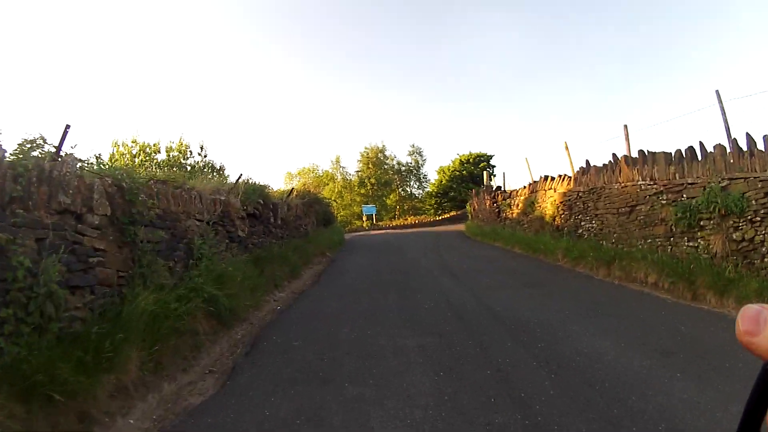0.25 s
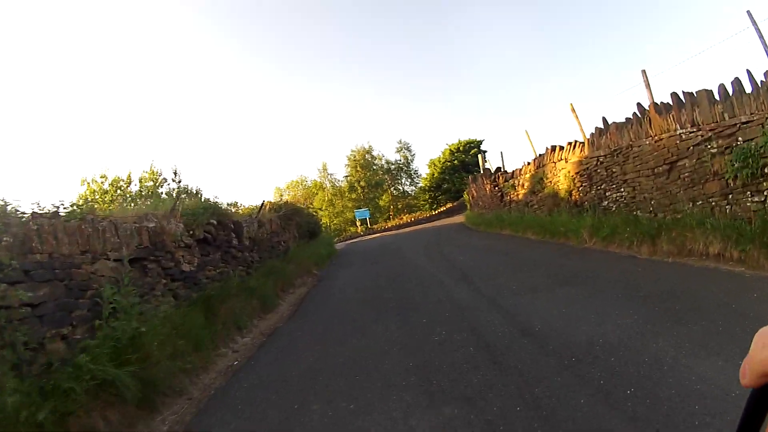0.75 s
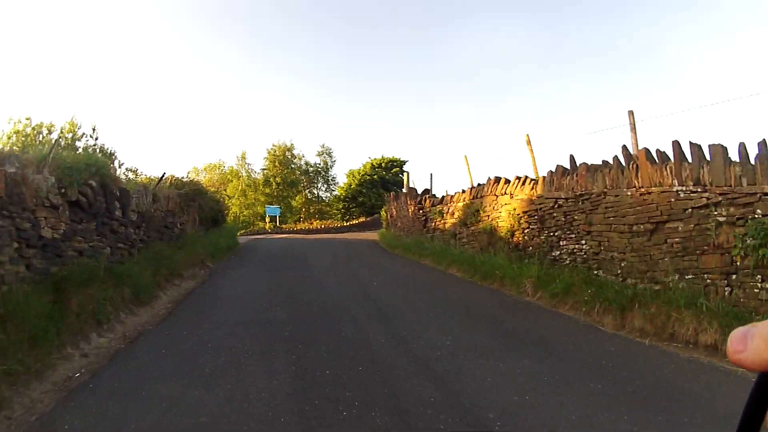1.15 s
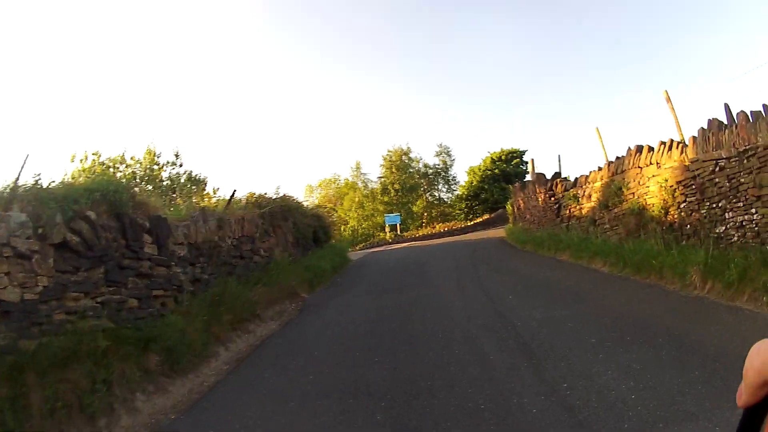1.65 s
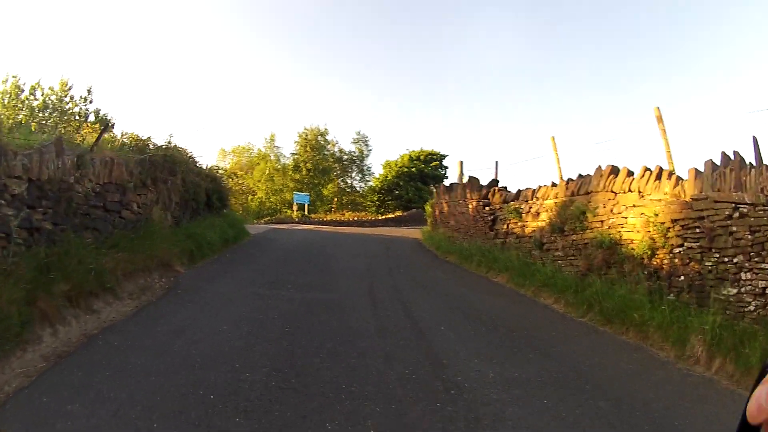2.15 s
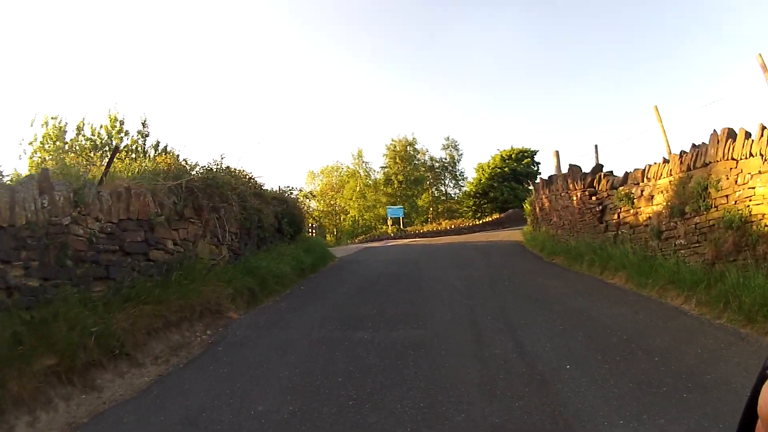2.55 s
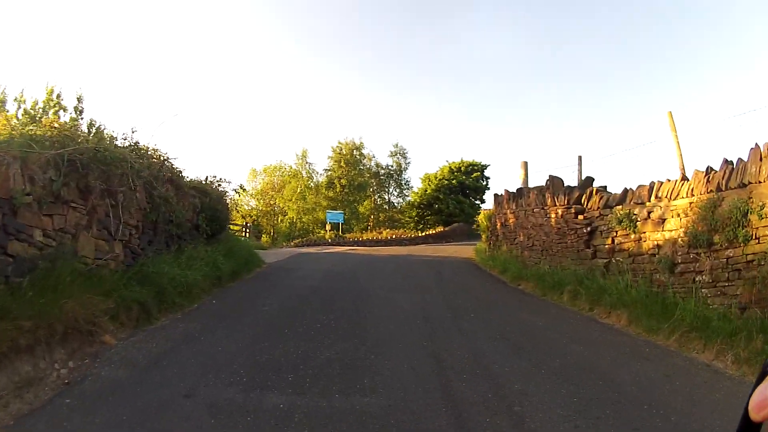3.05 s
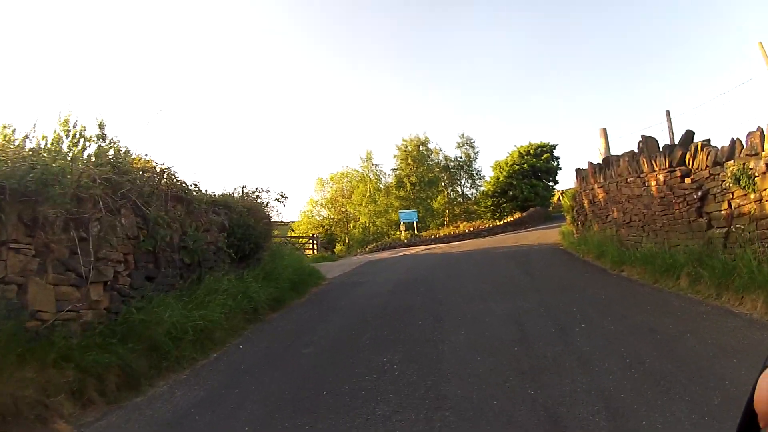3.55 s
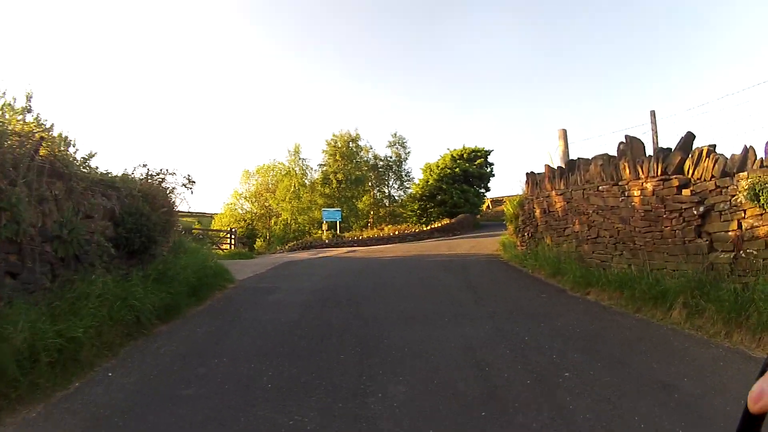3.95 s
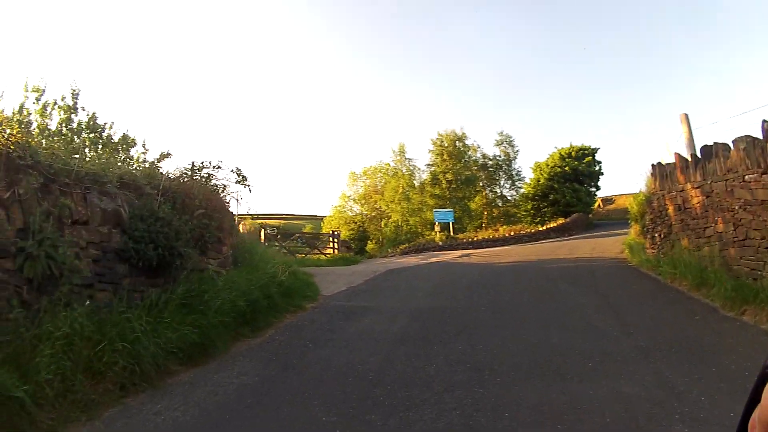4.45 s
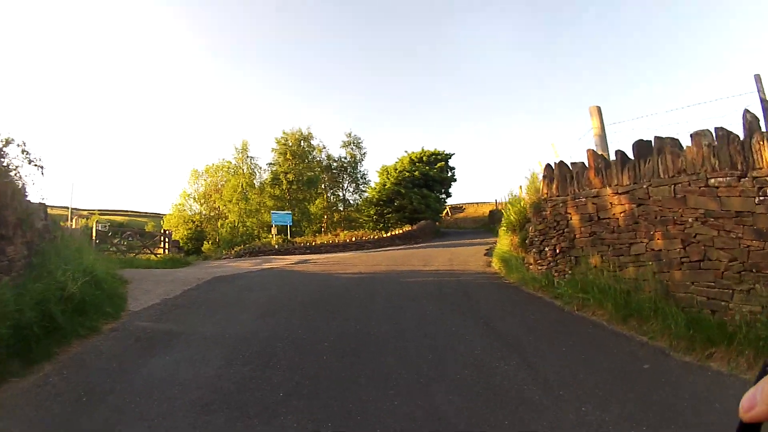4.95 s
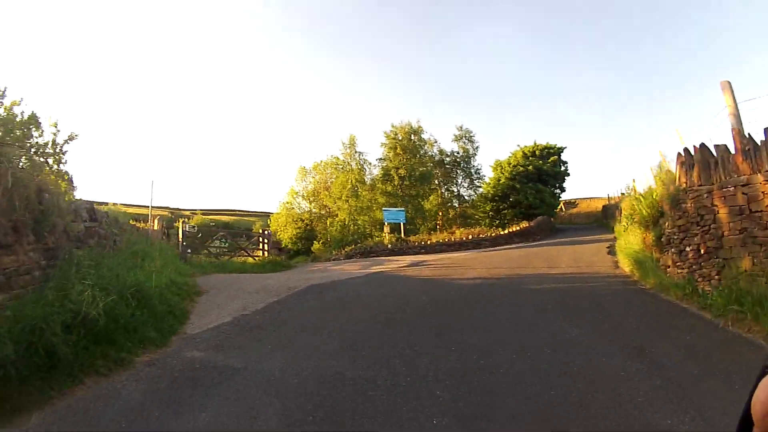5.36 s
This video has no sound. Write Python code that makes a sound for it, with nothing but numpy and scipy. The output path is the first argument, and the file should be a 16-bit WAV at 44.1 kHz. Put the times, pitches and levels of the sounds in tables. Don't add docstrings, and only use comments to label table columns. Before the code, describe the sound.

Continuous muffled road vibration from a climbing bike, dominated by low hum and rumble, rising and falling with each pedal stroke. Short dry plastic knocks and lighter ticks scatter throughout, denser in the first half, with brief cable scrapes near the start and a crisp snap at about 1.2 seconds. Outdoors with no audible echo; the single microphone sits inside a case on the bar, catching low wind thumps and faint electronic hiss.

```python
import sys
import numpy as np
from scipy import signal
from scipy.fft import rfft, irfft
from scipy.io import wavfile
from scipy.ndimage import uniform_filter1d, map_coordinates

SR = 44100
rng = np.random.default_rng(int(sys.argv[2]) if len(sys.argv) > 2 else 0)


def elevation(decibels):
    levels = np.asarray(decibels, float)
    return 10 ** (levels / 20)


def wrap_up_sound(samples):
    columns = np.atleast_2d(samples).T
    tamed = np.clip(columns, -1, 1)
    steps = np.round(tamed * 32767).astype(np.int16)
    wavfile.write(sys.argv[1], SR, steps)


N = 246519
TIME = np.arange(N) / SR

# [f/Hz, width/Hz, level/dB]
WALLS = [(672, 156, -10.5), (815, 142, -0.5), (986, 53.6, 3.5), (1108, 85, -3.5), (1442, 210, -11.5),
         (1715, 135, -11), (2001, 115, -11.5)]
# [f/Hz, width/Hz, level/dB]
CAVITY = [(2520, 193, 0.5), (2906, 126, 9), (3217, 318, -1.5), (3550, 280, -7.5)]
# [f/Hz, width/Hz, level/dB]
CLAMP_AND_DOOR = [(4236, 190, 4.5), (5080, 570, -4), (5510, 400, 0.5), (6220, 610, -6)]
# [t/s of full load, push/dB, slack after it/dB, bar twist/dB, fork dive/dB]
STROKES = [(-.1, 3, -4, -6, -2), (.37, 4.5, -5, 2, 0.5), (.84, 3.5, -3.5, 2.5, 0.5), (1.31, 4, -3, 4, -0.5),
           (1.76, 3.5, -4, 3, -0.5), (2.21, 4, -3, 1, -2), (2.71, 4, -4, 1, -0.5),
           (3.17, 4.5, -5.5, -2, 2.5), (3.65, 2.5, -4, 2, -2), (4.14, 3, -3, 4, 1.5),
           (4.64, 4.5, -3.5, -3, -1), (5.11, 3.5, -3.5, -4, 0), (5.59, 3.5, -4, -1, 0), (6.06, 3, -4, 0, 0)]


def unit(x):
    return x / np.sqrt(np.mean(x ** 2) + 1e-20)


def wobble(rate):
    knots = rng.standard_normal(int(N * rate / SR) + 4)
    return map_coordinates(knots, [TIME * rate])


def filtered(x, response):
    return irfft(rfft(x) * response(np.fft.rfftfreq(len(x), 1 / SR)), len(x))


def rung(x, modes, low_hz, high_hz):
    def response(f):
        peaks = 0
        for k, (centre, width, db) in enumerate(modes):
            peak = 1j * f * width / (centre * centre - f * f + 1j * f * width)
            peaks = peaks + (-1) ** k * elevation(db) * peak
        low_cut = (1j * f / (low_hz + 1j * f)) ** 2
        high_cut = (high_hz / (high_hz + 1j * f)) ** 3
        return peaks * low_cut * high_cut
    return filtered(x, response)


def struck(x, modes, low_hz, high_hz):
    blow = rung(np.eye(1, 2048)[0], modes, low_hz, high_hz)
    return rung(x, modes, low_hz, high_hz) / np.abs(blow).max()


def texture(*wobbles):
    return rng.standard_normal(N) * elevation(sum(db * wobble(rate) for rate, db in wobbles))


def evened(x, span, share):
    power = np.abs(uniform_filter1d(unit(x) ** 2, max(int(span * SR), 2))) + .02
    return unit(x / power ** (share / 2))


def contacts(events, low_hz, high_hz):
    t = np.arange(2048) / SR
    hz = np.fft.rfftfreq(len(t), 1 / SR)
    band = (hz > low_hz) & (hz < high_hz)
    drive = np.zeros(N + len(t))
    for s, db, contact in events:
        u = t / contact
        burst = rng.standard_normal(len(t)) * u * np.exp(-u)
        burst /= np.sqrt(np.mean(np.abs(rfft(burst)[band]) ** 2))
        longer = np.sqrt(1 + contact / 0.0013)
        drive[round(s * SR):][:len(t)] += elevation(db) * burst * longer
    return drive[:N]


def swells(rows):
    knots = TIME[::64]
    return np.interp(TIME, knots, sum(db * np.exp(-((knots - s) / half) ** 2) for s, db, half in rows))


def answer(part, extra_db=0):
    # [level/dB, dB per dB of load, lag/s, own unrest/dB, dB per dB of jolt]
    answers = dict(sway=(-36.3, 0.73, -.005, 1.1, .8), hum=(-43.5, 1.35, -.03, 1.5, 0.87),
               rumble=(-38.2, .95, .005, 0.6, .95), drone=(-51.3, .45, 0.1, 1.4, 1),
               walls=(-58.7, 1.05, -.015, 0.9, 1), tyre=(-67.2, .7, -.02, .6, 1.3),
               cavity=(-61.5, 0.5, -0.1, 0.8, 0.6), whistle=(-85, 0.14, 0.8, .6, 0.1))
    # [t/s, jolt/dB, half length/s]
    bumps = [(.06, 3, .02), (.31, 3, 0.011), (.43, 3, 0.016), (.705, 7, 0.019), (.86, 4.5, 0.032),
             (1.02, 2.5, 0.033), (1.26, 3.5, 0.024), (1.34, 3, 0.024), (1.48, 3, 0.026), (1.8, 2, 0.027),
             (1.95, 3, .03), (2.16, 2.5, 0.019), (2.52, 1.5, .03), (2.71, 2, .03), (3.13, 2, 0.022),
             (3.47, 5.5, .015), (3.58, 3, 0.018), (3.69, 2, 0.026), (3.81, 1.5, 0.022), (4.01, 3.5, .015),
             (4.13, 2.5, 0.03), (4.47, 3, 0.022), (4.69, 2, .02), (5.07, 2, 0.023), (5.46, 1.5, .03)]
    slack_at = 0.58
    level_db, grows, lag, unrest_db, shaken = answers[part]
    s, push, slack = np.transpose(STROKES)[:3]
    turns = np.ravel([s[:-1], s[:-1] + slack_at * np.diff(s)], "F")
    at_push = grows * push[:-1] + (extra_db + 0 * s)[:-1]
    load = np.ravel([at_push, grows * slack[:-1]], "F")
    place = np.interp(TIME - lag, turns, np.arange(len(turns)))
    eased = np.floor(place) + np.sin(np.pi / 2 * (place % 1)) ** 2
    load_db = np.interp(eased, np.arange(len(load)), load)
    return elevation(level_db + load_db + shaken * swells(bumps) + unrest_db * wobble(14))


def preamp_hiss():
    # [f/Hz, level/dB per Hz]
    colour = [(2940, -26.5), (5000, -4.5), (5530, -11.5), (7000, -6.5), (12300, -8), (15000, -9)]
    f, level = np.transpose(colour)
    noise = filtered(rng.standard_normal(N), lambda hz: elevation(np.interp(np.log(hz + 1), np.log(f), level)))
    return elevation(-77.5) * unit(noise)


def wind():
    # [t/s, buffet level/dB]
    air = [(0.0, -58), (0.03, -45), (0.28, -53), (0.39, -40), (0.48, -53), (0.9, -44.5), (2.63, -46.5),
           (2.72, -57), (2.79, -45.5), (3.49, -44.5), (3.53, -55), (3.77, -46.5), (3.95, -52), (4.03, -38),
           (4.17, -48.5), (5.17, -43), (5.31, -53), (5.59, -43)]
    # [t/s, swell/dB, half length/s]
    gusts = [
        (0, 7, .06),
        (.82, 5, .08),
        (1.28, 5, 0.1),
        (3.11, 6, .08),
        (4.05, 2.5, .04),
        (4.33, 6, .03),
        (5.28, 2.5, .05),
        (5.59, 7, 0.065),
    ]
    case_modes = [(54.4, 14, 3.5), (28, 14, -13.5)]  # f/Hz, width/Hz, level/dB
    buffet = evened(rung(texture(), case_modes, low_hz=13, high_hz=150), span=0.25, share=0.54)
    whistle = unit(rung(texture((25, 1.5), (80, 2.2)), CLAMP_AND_DOOR[1:], low_hz=3930, high_hz=8800))
    buffet_gain = elevation(np.interp(TIME, *np.transpose(air)) + 1.5)
    whistle_gain = answer("whistle") * elevation(swells(gusts) + 2.5)
    return buffet_gain * buffet + whistle_gain * whistle


def case():
    grains = (rng.random(N) < 420 / SR) * elevation(2.7 * rng.standard_normal(N))
    grit = unit(signal.fftconvolve(grains, np.hanning(80), "same"))
    buzz = unit(elevation(2.2 * wobble(40)) * texture((120, 1.5)) * (1 + 0.53 * grit))
    drone = rung(texture((20, 1.2)) + .3 * buzz, WALLS[:4], low_hz=405, high_hz=2520)
    drone = evened(drone, span=0.077, share=0.67)
    hiss = unit(rung(texture((60, 1.2)) + 0.47 * buzz, WALLS[4:], low_hz=1180, high_hz=3980))
    cavity = unit(rung(buzz, CAVITY, low_hz=2350, high_hz=5600))
    clamp = unit(rung(buzz * elevation(0.93 * wobble(10)), CLAMP_AND_DOOR[:1], low_hz=4000, high_hz=9000))
    walls = answer("walls") * drone + answer("tyre") * hiss
    return walls + answer("cavity") * (cavity + elevation(-18) * clamp)


def snap():
    # [t/s, level/dB]
    blow = (1.1712, -30.5)
    # [f/Hz, level/dB, t60/s]
    door = [(2320, 1.5, 0.006), (2850, -0.5, 0.0065), (3500, -4, 0.0036), (4260, -5, .004),
            (5270, 3, 0.0047), (6200, -12, 0.0053), (8200, -19, 0.0037), (9600, -19, .004),
            (12500, -26, .003)]
    t = TIME[:2048]
    ring = sum(elevation(db - 60 * t / t60) * np.sin(2 * np.pi * hz * t) for hz, db, t60 in door)
    onset = 1 - np.exp(-(t / 0.00039) ** 2)
    start = round(blow[0] * SR)
    return np.pad(elevation(blow[1]) * ring * onset, (start, N - start - len(t)))


def knocks():
    # [t/s, peak/dB, wall modes/dB, contact/ms]
    hard_knocks = [(0.0822, -38.1, -23, 1.5), (0.3032, -39.2, -17, 0.87), (0.443, -33.5, -21, 1.7),
                   (0.4977, -34.8, -16, 0.92), (0.7262, -31.1, -36, 1.1), (0.7544, -33.1, -23, 1.6),
                   (0.9773, -34.1, -25, 1.2), (1.048, -42.9, -14, 1.1), (1.36, -37.4, -21, 0.92),
                   (1.3799, -36.3, -18, 0.7), (1.3959, -30.1, -28, 0.63), (1.6214, -35.1, -11, 0.89),
                   (1.9037, -41.7, -13, 1.2), (1.9167, -36.2, -19, 1.2), (2.5373, -35.4, -21, 1.1),
                   (2.5942, -35.7, -13, 1.1), (2.6211, -34.9, -20, 1.5), (3.0491, -38.7, -18, 0.8),
                   (3.2382, -35.1, -20, 0.92), (3.4806, -35.3, -23, 1.2), (3.5545, -35.0, -26, 1.2),
                   (3.7894, -34.5, -28, 0.45), (3.9142, -39.8, -12, 1.7), (4.0055, -36.6, -11, 0.82),
                   (4.2025, -39.1, -15, 0.82), (4.3861, -38.1, -24, 0.78), (4.4884, -36.0, -25, 0.65),
                   (4.6974, -36.3, -24, 1.1), (5.2711, -36.7, -27, 1.1), (5.5001, -37.2, -19, 0.48)]
    # [t/s, peak/dB]
    taps = [(0.2173, -50.6), (0.4299, -47.9), (0.4642, -36.2), (0.706, -40.3), (1.098, -45.5),
            (1.2956, -39.2), (1.563, -38.2), (1.8798, -40.2), (2.0378, -41.4), (2.0707, -39.3),
            (2.1008, -39.3), (2.277, -38.7), (2.9204, -50.5), (2.9367, -40.8), (3.096, -43.2),
            (3.205, -42.7), (3.537, -46.5), (3.5939, -38.7), (3.8413, -37.5), (3.9002, -44.2),
            (4.0284, -46.7), (4.0784, -42.4), (4.1042, -38.6), (4.2215, -38.9), (4.3148, -39.7),
            (4.5283, -36.4), (4.5512, -40.3), (4.641, -44.7), (5.4013, -47.1), (5.447, -41.2)]
    # [t/s, peak/dB, door modes/dB]
    ticks = [(0.0263, -56.6, -20), (0.0338, -56.7, -19), (0.0782, -52.1, -11), (0.2199, -57.6, -17),
             (0.3242, -50.0, -24), (0.3471, -58.7, -1), (0.6799, -57.8, -14), (0.7048, -55.9, -15),
             (0.7233, -50.8, -19), (0.7597, -52.2, -27), (0.9782, -56.9, -14), (1.3954, -50.9, -16),
             (1.6209, -52.2, -14), (1.6738, -54.8, -20), (2.3916, -62.3, -6), (2.5917, -61.9, -9),
             (2.7259, -58.2, -20), (3.414, -58.0, -26), (3.4627, -57.8, -14), (3.5021, -56.1, -21),
             (3.8413, -48.4, -12), (4.08, -62.9, 6), (4.3846, -55.0, -1), (4.4859, -50.1, -22),
             (4.8191, -56.7, -8), (5.0172, -55.5, -16), (5.0735, -61.3, -16), (5.1778, -53.9, -21),
             (5.2706, -55.3, -23), (5.5619, -62.3, -4)]
    # [t/s, peak/dB, clamp/dB, door/dB, contact/s]
    scrapes = [
        (0.023, -41, -5.5, -29, 0.0076),
        (.074, -42, -5.5, -21, 0.004),
        (.296, -49.5, 3, -31, 0.0035),
        (.312, -43, -19, -30, .007),
        (1.387, -39, -21, -27, 0.0024),
    ]
    light_wall_db, tap_ms = -15.5, 1.1
    rattle_per_s, rattle_db, rattle_spread_db, rattle_ms = 40, -50.5, 2, 0.84
    luck = rng.random((round(N / SR * rattle_per_s), 2))
    rattle = [(s * TIME[-1], rattle_db - rattle_spread_db * np.log(1 - u)) for s, u in luck]
    blows = (hard_knocks + [(s, db, light_wall_db, tap_ms) for s, db in taps]
             + [(s, db, light_wall_db, rattle_ms) for s, db in rattle])

    cavity = [(s, db, ms * .001) for s, db, _, ms in blows]
    cavity += [(s, db, contact) for s, db, _, _, contact in scrapes]
    walls = [(s, db + wall_db, ms * .001) for s, db, wall_db, ms in blows]
    clamp = [(s, db, .0015) for s, db, _ in ticks]
    clamp += [(s, db + up, contact) for s, db, up, _, contact in scrapes]
    door = [(s, db + up, .0008) for s, db, up in ticks]
    door += [(s, db + up, contact) for s, db, _, up, contact in scrapes]
    return (elevation(-4.9) * struck(contacts(cavity, 2703, 3155), CAVITY, low_hz=2510, high_hz=6000)
            + elevation(1.5) * struck(contacts(walls, 1500, 2100), WALLS[4:], low_hz=1210, high_hz=4040)
            + elevation(-5.0) * struck(contacts(clamp, 4100, 4400), CLAMP_AND_DOOR[:1], low_hz=4000, high_hz=9000)
            + elevation(2.5) * struck(contacts(door, 4900, 6000), CLAMP_AND_DOOR[1:], low_hz=4000, high_hz=5000))


def frame():
    # [f/Hz, width/Hz, level/dB]
    fork = [(77.6, 34.5, -11.5), (99.9, 19.3, -2), (127, 27.4, -10)]
    bar = [(154.5, 35.5, -5), (178, 28, 1)]
    tubes = [(230.2, 26.2, -1), (271.1, 26, -2.5), (344.4, 30.4, -3)]
    stem = [(415, 57.5, 1), (475, 64, 0.5), (536.7, 37, 1.5)]
    # [t/s, peak/dB, contact/s]
    thuds = [(0.062, -31, 0.002), (0.283, -39, 0.0023), (0.499, -41, 0.0016), (0.533, -36, 0.002),
             (0.755, -39, 0.002), (1.121, -31, 0.0018), (1.536, -36, 0.0022), (1.623, -33.5, 0.0016),
             (1.878, -32.5, 0.0013), (2.398, -38, 0.0018), (2.592, -30, 0.0015), (3.795, -39, 0.0012),
             (4.529, -37, 0.0018), (5.447, -40, 0.002), (5.526, -37, 0.0015)]
    sway = evened(rung(texture(), fork, low_hz=40.0, high_hz=380), span=0.049, share=0.53)
    hum = evened(rung(texture(), bar, low_hz=123, high_hz=308), span=0.13, share=0.38)
    rumble = evened(rung(texture((60, 1.5)), tubes, low_hz=142, high_hz=508), span=0.098, share=0.39)
    drone = evened(rung(texture((70, 1.5)), stem, low_hz=388, high_hz=654), span=0.077, share=0.28)
    stones = struck(contacts(thuds, 450, 880), stem[1:] + WALLS[:3], low_hz=300, high_hz=900)
    twist_db, dive_db = np.transpose(STROKES)[3:]
    rolling = answer("sway", dive_db) * sway + answer("hum", twist_db) * hum
    rolling = rolling + answer("rumble") * rumble + answer("drone") * drone
    return rolling + elevation(-10.5) * stones


def scene():
    return (wind() + case() + snap() + knocks() + frame())[None]


def band_limit(x):
    return signal.sosfilt(signal.butter(12, 15170, fs=SR, output="sos"), x)


def record(dry):
    fade = np.clip((TIME[-1] - TIME) / .002, 0, 1)
    return band_limit((dry + preamp_hiss()) * fade)


dry = scene()
out = record(dry)
wrap_up_sound(out)
```